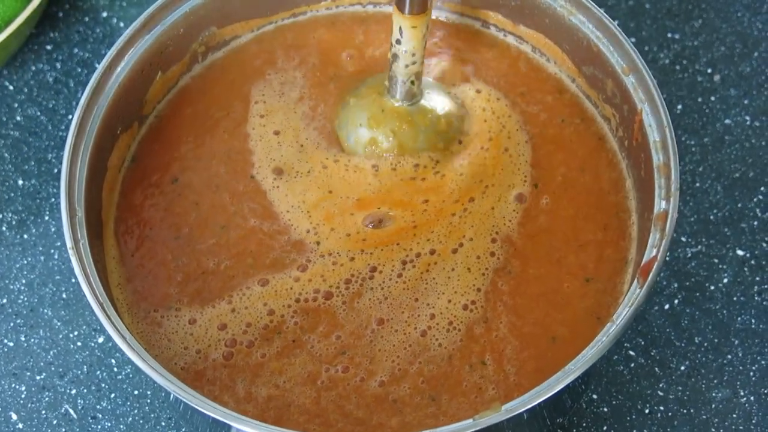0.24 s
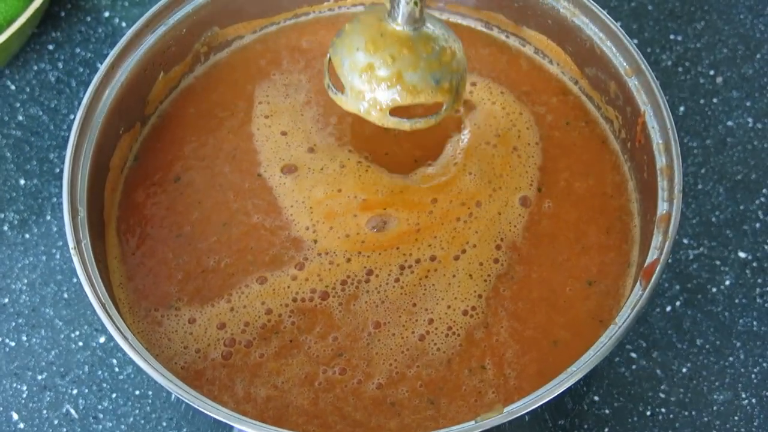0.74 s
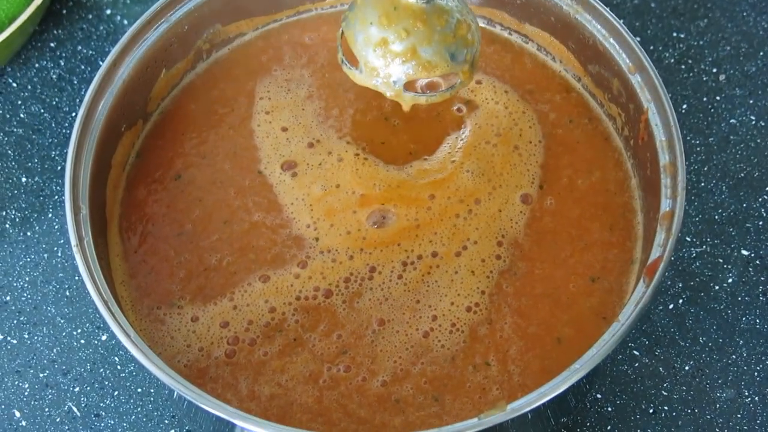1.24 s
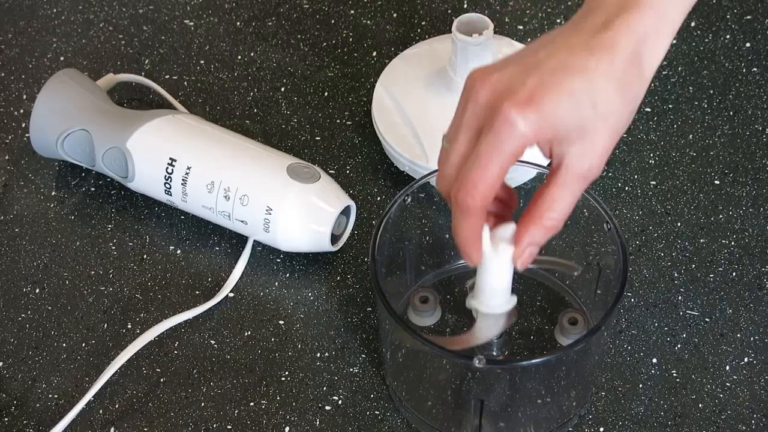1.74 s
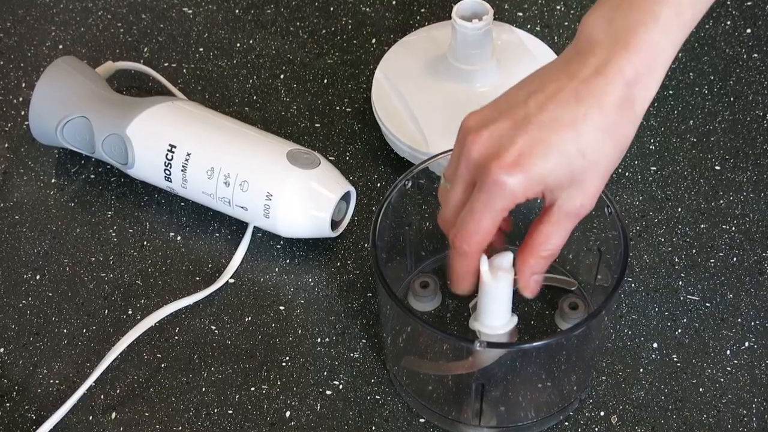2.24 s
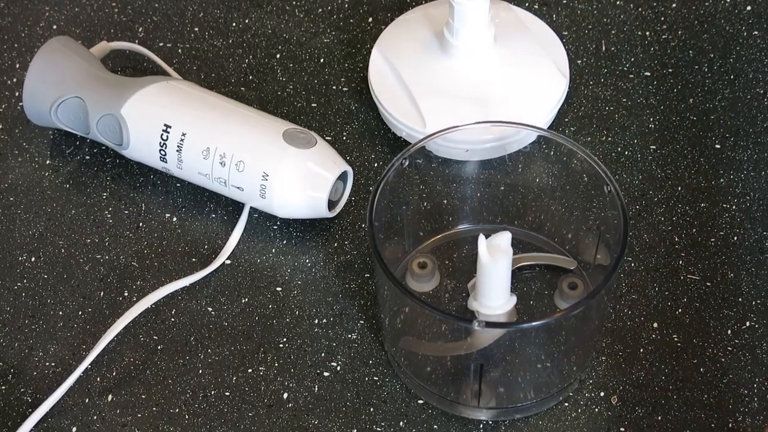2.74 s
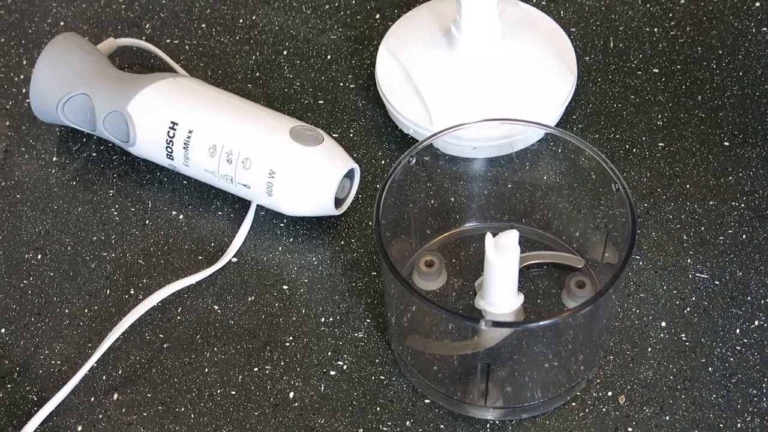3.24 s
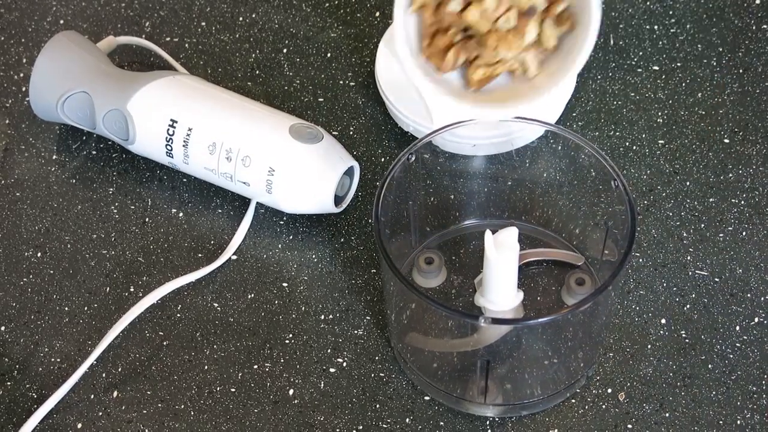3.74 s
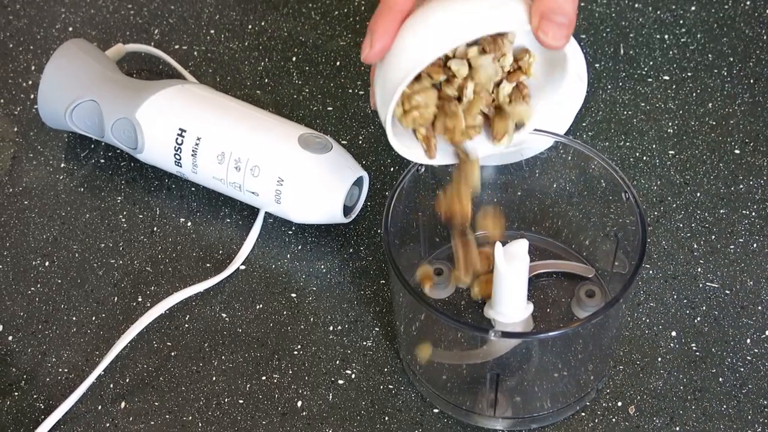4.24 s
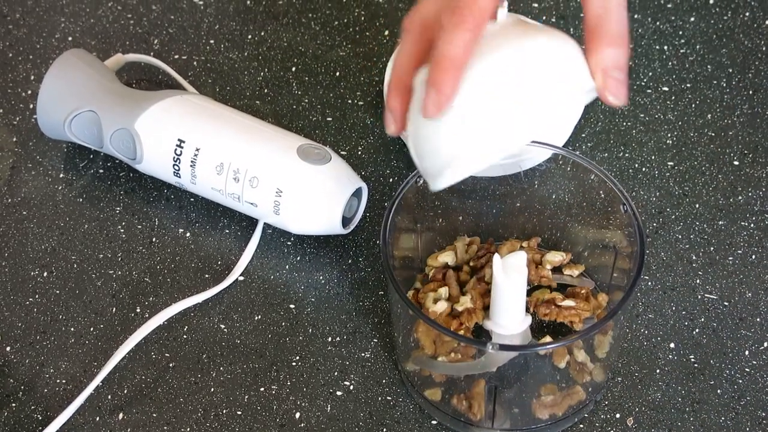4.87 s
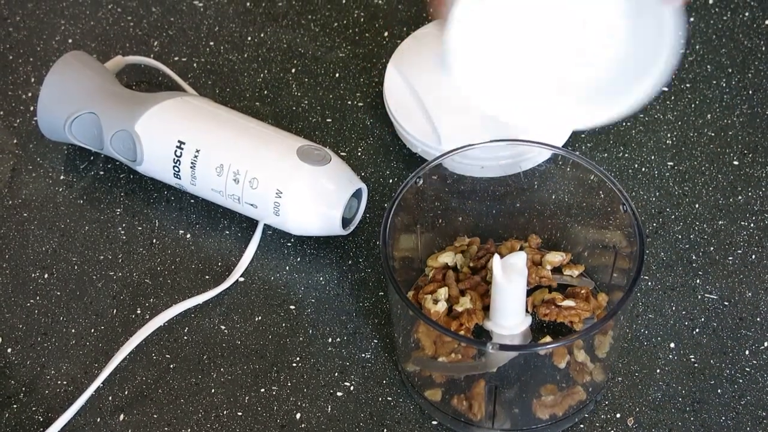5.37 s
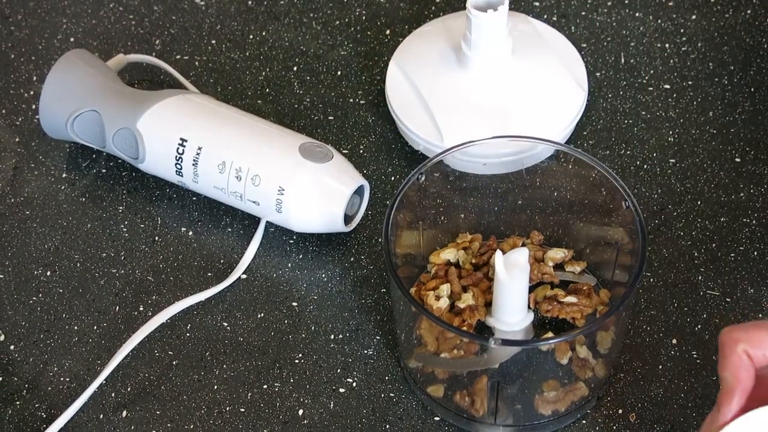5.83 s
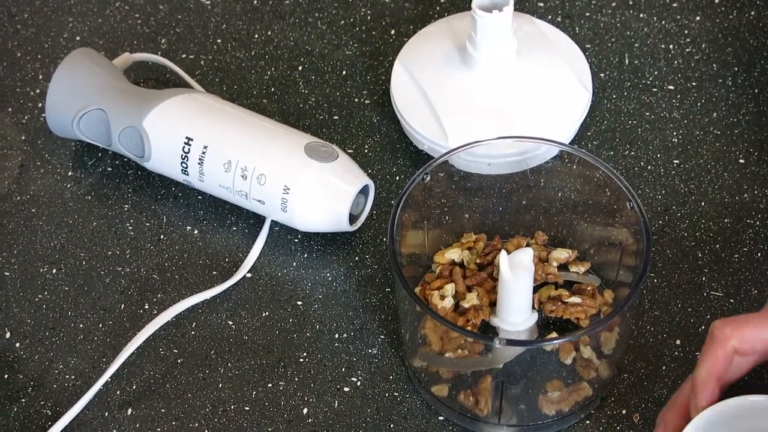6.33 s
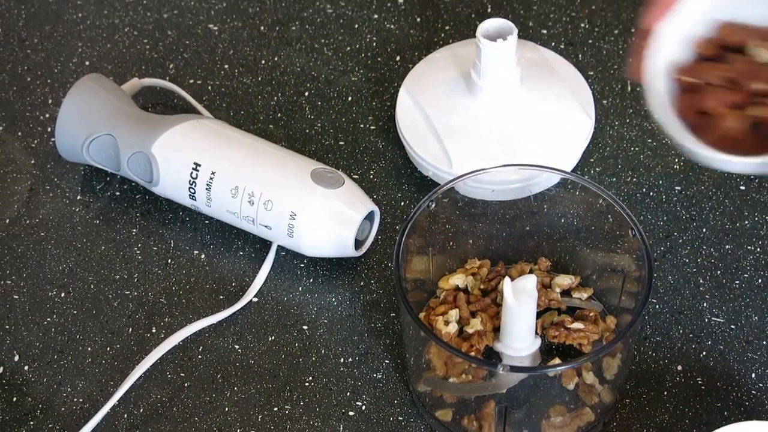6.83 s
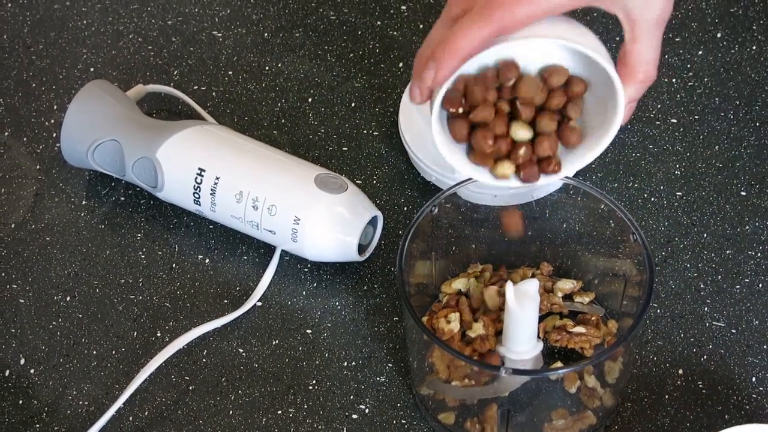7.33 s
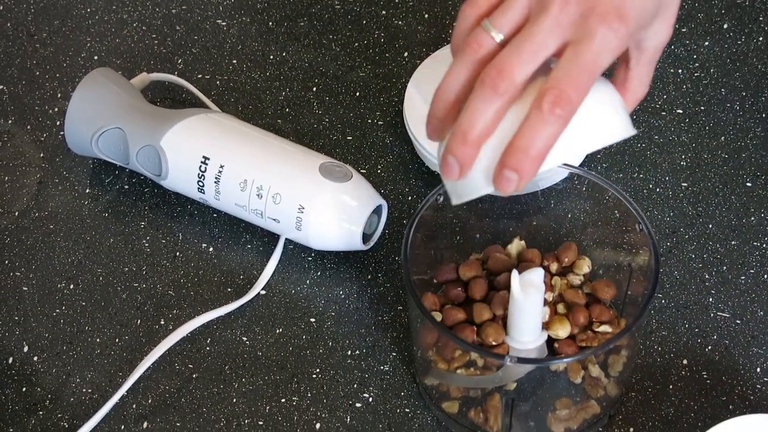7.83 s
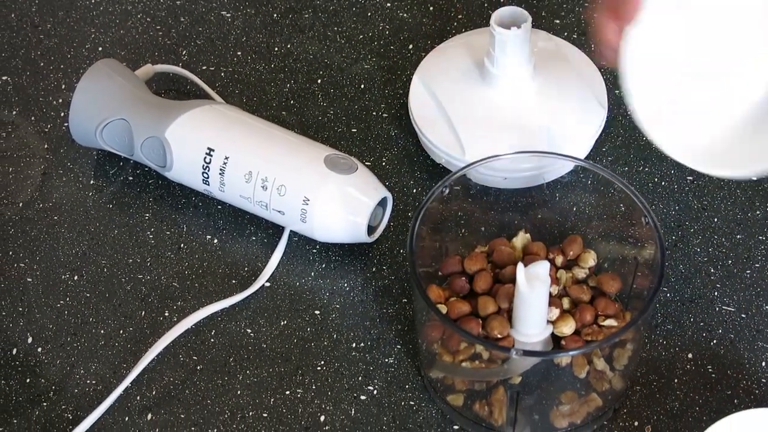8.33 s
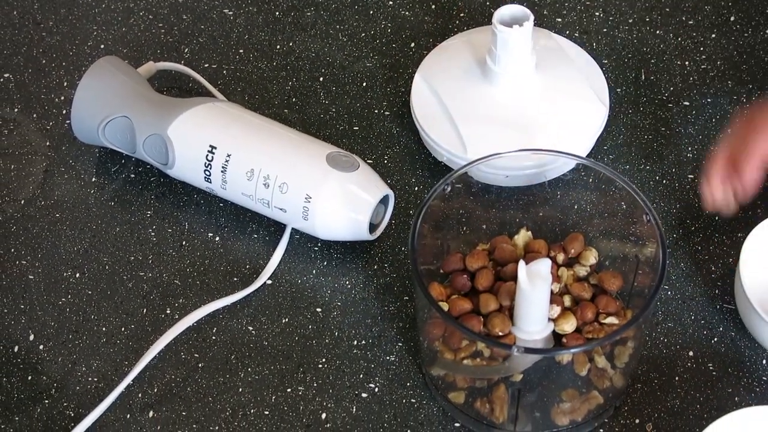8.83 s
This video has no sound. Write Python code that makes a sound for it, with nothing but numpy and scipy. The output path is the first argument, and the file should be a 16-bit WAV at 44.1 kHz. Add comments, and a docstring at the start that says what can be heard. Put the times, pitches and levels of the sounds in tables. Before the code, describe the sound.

Over a pot of soup, low room hum with swelling hiss, a few drips and a small metal tick. The sound cuts out briefly, then loud hollow plastic clacks as a blade is fitted. Two pours of nuts rattle sharply in the plastic beaker, each ended by an empty china bowl thudding onto a stone-like worktop. Close, wide stereo pickup in a lively kitchen; loud moments push the background down.

```python
"""A quiet kitchen: a blender foot drips over a pot; after a short silence a blade clicks onto the pin of a plastic
beaker, two china bowls of nuts are poured into it and set down on the worktop. Struck things are decaying modes
plus cracks of filtered noise; nuts are a random train of blows; room tone is shaped random spectra. The hard room
rings after every knock; automatic gain ducks the loud moments and the hum with them, and the loudest peaks clip."""
import sys
import numpy as np
from scipy import signal
from scipy.io import wavfile
from scipy.ndimage import uniform_filter1d

SR = 44100
rng = np.random.default_rng(int(sys.argv[2]) if len(sys.argv) > 2 else 0)


def persist_wave(psi):
    """Save psi, clipped to +-1, as 16-bit WAV."""
    counts = np.round(np.clip(psi, -1, 1) * 32767).astype(np.int16)
    wavfile.write(sys.argv[1], SR, np.atleast_2d(counts).T)


N = 401310

# Room tone over the pot, then at the worktop. Each row: frequency in Hz, relative density in dB per Hz.
POT_TONE = [(18, -44), (30, -40), (53, -5.5), (81, -41), (118, -9), (174, -5.5), (404, -8), (616, -13.5),
            (666, -14), (1390, -18), (3140, -33.5), (6210, -41), (16000, -56.5)]
TOP_TONE = [(18, -71), (30, -12.5), (70, -17), (98, -4), (179, -13.5), (328, -8.5), (554, -11.5), (740, -9),
            (1040, -17), (1430, -17.5), (1630, -19), (3140, -33), (8300, -37.5), (13300, -42.5),
            (16000, -44)]
# Hums in each tone. Each row: centre in Hz, width in Hz, level in dB.
POT_HUMS = [(118, 4.4, -51.5), (330, 15, -54.5), (417, 23, -56)]
TOP_HUMS = [(100.6, 4.7, -61), (321.4, 24, -54.5), (5130, 8, -75)]
POT_TONE_DB, TOP_TONE_DB = -47.5, -44
# Swell of the pot's room tone. Each row: time in seconds, relative level of the mids in dB, of the treble hiss in dB.
POT_SWELL = [(0, -1, 13), (.18, -10, 3.5), (.38, -1, 8), (.52, -3, 16), (.7, -5.5, 6), (.9, -2, 9.5),
             (1.35, 0, 10.5), (1.57, -6, 8)]
# Stereo likeness of the room tone. Each row: frequency in Hz, left-right correlation (-1 to 1).
LIKENESS = [(60, 0.19), (180, 0.073), (550, 0.077), (1650, 0.12), (5000, 0.32), (15000, 0.15)]
DRONE_HZ, DRONE_DB = 102.7, -53.5
SILENCE_START_S, SILENCE_END_S = 1.572, 1.737

# Soup falling back into the pot. Each row: start in seconds, level in dB, starting bubble pitch in Hz.
DRIPS = [(.06, -32, 330), (.09, -40, 570), (.144, -32.5, 613)]
# Foam pops. Each row: start in seconds, level in dB, starting pitch in Hz.
FOAM_POPS = [(0.326, -37.5, 8480), (0.4144, -43, 7180), (0.5506, -43, 11300), (0.6549, -49, 12400)]
# Modes of the steel pot. Each row: frequency in Hz, relative level in dB, t60 in seconds.
POT_MODES = [(960, -14, 0.056), (1064, -2, 0.086), (1300, -5, 0.053), (1770, 2, 0.019), (2144, 5.5, 0.041),
             (2400, 1, 0.013), (3300, -7, 0.013)]
POT_TICK_S, POT_TICK_DB = 0.6155, -22.5

# Reverberation of the kitchen. Each row: frequency in Hz, t60 in seconds.
KITCHEN_T60 = [(100, 0.18), (260, 0.52), (700, 0.71), (1840, 0.64), (4850, 0.59), (12800, 0.33)]

# Modes of two china bowls and the steel blade, one table each. Each row: frequency in Hz, relative level in dB,
# t60 in seconds when free.
CHINA_MODES = [
    [(2205.3, 2.5, 0.95), (2214, -0.5, 0.95), (5520, -16, 0.32), (8500, -24, 0.34), (13600, -36, 0.41)],
    [(2212, 12.5, 0.44), (2370, 1, 0.4), (5720, -6, 0.62), (8300, -54, 0.23), (13710, -31, .4)],
    [(2590, -0.5, .15), (2380, -4, .15), (5300, -13.5, .15)],
]
# Nuts, fingers or the worktop chink a bowl or the blade, one table each. Each row: start in seconds, level in dB,
# hardness in dB per octave, share of the free t60, tick in dB, left over right in dB.
CHINKS = [
    [(3.8372, -35.5, 9, 0.064, -38, 3), (4.134, -41.5, 2, 0.018, -45.5, 27),
     (6.385, -24.5, -8, 0.88, -72, 1)],
    [(7.0499, -51, 4, 0.15, -42, -5), (7.0745, -42.5, 9.5, 0.074, -29, -4.5),
     (7.1038, -44, -1, 0.05, -37, -8), (7.088, -41, 3, 0.05, -40, -2), (7.125, -43, 4, 0.05, -45, -2),
     (7.15, -46, 7, 0.05, -44, -2), (7.213, -31, -6, 0.031, -25.5, -3), (8.6527, -110, -56, 0.17, -15.5, 6)],
    [(1.833, -36, 3, 0.26, -46, 0), (1.855, -26, 0.6, 0.21, -50, 0)],
]
DAMPED_ROOM_DB, FREE_ROOM_DB = -2.5, -18  # room send of a damped chink; change towards a fully free ring

# Modes of the plastic beaker. Each row: nominal frequency in Hz, relative level in dB, t60 in seconds.
BEAKER_MODES = [(619, -12, 0.19), (700, -15, 0.048), (771.3, 1.5, 0.14), (821.4, 0.5, 0.14),
                (924, 2.5, 0.061), (1370, 1, 0.031), (1465, 6, 0.021), (1500, 5, 0.075), (1664, 6.5, 0.036),
                (1860, -14.5, 0.019), (2417, -1.5, 0.034), (2485, 12, 0.023), (2860, -29, 0.067),
                (3200, -4.5, 0.078), (3516, -2.5, 0.053), (4464, -4, 0.027), (5030, 8.5, 0.024),
                (5390, 9.5, 0.022), (5980, 4, 0.026), (6510, -33, .02), (7870, -13, 0.013),
                (9650, 11, 0.011), (10500, 3, 0.018)]
# Edges in Hz between the bands of base, wall, rim, spindle and bare contact.
PART_EDGES_HZ = 480, 1100, 2000, 4000, 7300, 15500
# Crack in each part, ordered wall, base, rim, spindle, contact. Each row: dB over the ring, decay constant in ms.
CRACKS = [(0.5, 3.5), (-2, 4.4), (-3.5, 2.4), (-3.5, 4.3), (-0.5, 2.9)]
# Blade, bowl rim, walnut, hazelnut on the beaker. Each row: base, rim, spindle and contact in dB over the wall,
# left over right in dB, rise in ms.
STRIKERS = [(-2, -7, -5, -17.5, 5.5, 0.31), (1, 1.5, -4.5, -10.5, -0.5, 0.38),
            (-8, 2.5, 1, -8.5, -1.5, 1.8), (-13.5, -5, -10.5, -22.5, -2, 1.7)]
# Gain in dB of base, rim, spindle and contact for each dB of hardness.
HARDNESS_GAINS = 0.14, 0.91, 1.056, 1.03
PART_SPREAD_DB, PAN_SPREAD_DB = 2, 2.5  # from blow to blow
# Blows that stand out, one table per striker. Each row: start in seconds, wall level in dB, hardness in dB.
BLOWS = [
    [(1.8557, -40, 5), (1.949, -4, -6), (1.9886, -17, -10), (2.074, -4.5, 4.5), (2.0844, -23, -6)],
    [(3.918, -5.5, -1.8), (7.7855, -16.5, 9), (7.809, -25.5, 5)],
    [(4.1578, -28.5, 15), (4.2404, -14, -16), (4.2589, -10.5, 3.5), (4.2637, -12, -3), (4.2904, -22, -1),
     (4.2945, -9.5, 3.5), (4.319, -34, -6), (4.3345, -4, 0.5), (4.3644, -18, 7.5), (4.4282, -8, 2),
     (4.4636, -11, 4), (4.5032, -4.5, 3.5), (4.5304, -5, -6), (4.5596, -18, 11), (4.6204, -5, -4.2),
     (4.6954, -11.5, 3.5), (4.7442, -16, -3.5), (4.7924, -12.5, 0), (4.8149, -9.5, -6), (4.9, -21.5, 0),
     (5.0174, -33, 5.5), (5.0932, -54.5, 24)],
    [(7.2599, -13.5, -4), (7.3101, -19, -13), (7.3223, -16.5, -3), (7.365, -17, 5.5), (7.422, -9.5, 4.5),
     (7.4954, -23, -9), (7.5178, -13.5, 12), (7.5403, -11, 3), (7.5604, -10, 1), (7.575, -8.5, 2),
     (7.5987, -31, -9), (7.6154, -13, 9.5), (7.6984, -13.5, 4), (7.7424, -22.5, 12), (7.862, -37, -24)],
]

# Modes of the worktop. Each row: nominal frequency in Hz, relative level in dB, t60 in seconds.
WORKTOP_MODES = [(413, -2, .07), (566, -13, 0.16), (644, -14.5, 0.011), (808, -9, 0.028), (924, -13, 0.011),
                 (1040, -30, 0.011), (1200, -3, 0.045), (1426, 6.5, 0.02), (1696, 10, 0.016),
                 (2070, 10.5, 0.0035), (2470, 16, 0.003), (3010, 8.5, 0.0015)]
# Things set down, and their bounces. Each row: start in seconds, peak in dB, highest driven frequency in Hz,
# scrape in dB, scrape decay constant in seconds, room send in dB over the peak.
KNOCKS = [(2.94, -36, 950, -41, 0.032, 12.5), (6.0184, -5, 1500, -34, 0.0043, 11.5),
          (6.303, -27.5, 700, 0, 0.013, -4), (6.32, -7.5, 2290, -14, 0.02, 9.5),
          (6.336, -1, 3200, -19, 0.0034, 3.5), (6.354, -4.5, 2300, -18.5, 0.0052, -5.5),
          (8.6534, 3.5, 3300, -21.5, 0.0044, 4.5), (8.667, -3.5, 4300, -35, 0.0024, 11)]
LOW_FLOOR_HZ, LOW_SHARE = 253, 0.053  # lowest driven pitch: a floor plus a share of the highest
# The weight of a bowl lands. Each row: start in seconds, level in dB.
BOOMS = [(6.0206, -28.5), (6.326, -32.5), (8.6518, -28)]
SLAB_HZ, SLAB_T60_S = 118.2, 0.41

# Walnuts, then hazelnuts, tumbling onto the heap. Each row: time in seconds, relative wall level in dB, hardness in dB.
POURS = [
    [(4.235, -27, -4.5), (4.32, -26, -21), (4.62, -26, -6), (4.78, -51, 0.1), (5.1, -69, 5.5)],
    [(7.26, -44, -7), (7.42, -40.5, -25), (7.56, -20, 3.5), (7.7, -33.5, -1), (7.9, -39.5, -14)],
]
NUTS_PER_S = 190  # mean rate
HEAP_BASE_DB = 10.5  # the heap passes the tumbling on to the base

TREBLE_EDGE_HZ = 15800


def gain_of(db):
    """Decibels to a factor."""
    return 10 ** (np.asarray(db) / 20)


def evened(x):
    """Scales to rms 1."""
    return x / np.sqrt(np.mean(x ** 2) + 1e-20)


def read(points, hz):
    """Reads a spectrum table on a log-frequency axis."""
    f, value = np.transpose(points)
    return np.interp(np.log(hz + 1), np.log(f + 1), value)


def add(mix, start_s, sound, pan_db):
    """Adds a sound to the mix; positive pan favours the left."""
    part = mix[:, round(start_s * SR):][:, :len(sound)]
    part += gain_of([[pan_db / 2], [-pan_db / 2]]) * sound[:part.shape[1]]


def without_bass(x, hz):
    """A small thing radiates little below its lowest mode."""
    return signal.sosfilt(signal.butter(5, hz, "high", fs=SR, output="sos"), x)


def ring(modes, size=3000):
    """One blow, peak 1: where it lands decides how strongly each mode speaks."""
    hz, db, t60_s = np.transpose(modes)[:, :, None]
    level_luck, pitch_luck = rng.standard_normal((2, len(modes), 1))
    t = np.arange(size) / SR
    envelope = gain_of(db + 3 * level_luck - 60 * t / t60_s)
    x = (envelope * np.sin(2 * np.pi * hz * (1 + 0.0057 * pitch_luck) * t)).sum(0)
    return x / abs(x).max()


def crack(low_hz, high_hz, ms, size=3000):
    """Decaying band of noise, peak 1: two hard surfaces meeting."""
    x = rng.standard_normal(size) * np.exp(-np.arange(size) / SR * 1000 / ms)
    x = signal.lfilter(*signal.butter(2, [low_hz, high_hz], "band", fs=SR), x)
    return x / abs(x).max()


def room_tone(tone, tone_db, hums, mid_db=0, hiss_db=0):
    """Random short-time spectra with drifting patches; hums are narrow humps that waver."""
    frames, hz = (N // 512 + 5) // 2, np.fft.rfftfreq(4096, 1 / SR)[:, None]
    a, b, c, d = rng.standard_normal((frames, 2049, 4)).T
    patches = uniform_filter1d(rng.standard_normal((frames, 2049)).T, 30, 0)
    patches = evened(uniform_filter1d(patches, 4, 1))

    likeness = np.clip(read(LIKENESS, hz), -1, 1)
    left = a + 1j * b
    right = likeness * left + np.sqrt(1 - likeness ** 2) * (c + 1j * d)

    wash = gain_of(read(tone, hz))
    wash = wash * gain_of(tone_db) / np.linalg.norm(wash)
    power = wash ** 2
    for centre_hz, width_hz, hum_db in hums:
        hump = 1 / (1 + (2 * (hz - centre_hz) / width_hz) ** 4)
        power = power + gain_of(2 * hum_db) * hump / hump.sum()
    shape = np.sqrt(power)

    mids = 1 / (1 + (150 / (hz + 1)) ** 4 + (hz / 2500) ** 4)
    highs = 1 / (1 + (6000 / (hz + 1)) ** 4)
    moving = gain_of(1.54 * patches + mids * mid_db + highs * hiss_db)
    spectra = np.array([left, right]) * shape * moving
    x = signal.istft(spectra, nperseg=4096, noverlap=3072)[1][:, :N]
    return evened(x) * np.linalg.norm(shape)


def pot():
    """Bubbles of falling drips rise a little in pitch; foam pops; the steel ticks."""
    out, t = np.zeros((2, N)), np.arange(3000) / SR
    for start_s, db, hz in DRIPS:
        envelope = gain_of(db - 60 * t / 0.036) * np.minimum(t / 0.0013, 1)
        add(out, start_s, envelope * np.sin(2 * np.pi * hz * t * (1 + 2.0 * t)), 0)
    for start_s, db, hz in FOAM_POPS:
        envelope = gain_of(db - 60 * t / 0.0028)
        add(out, start_s, envelope * np.sin(2 * np.pi * hz * t * (1 + 8.0 * t)), 0)
    tick = ring(POT_MODES) + gain_of(-10.5) * crack(1150, 2900, ms=5.9)
    add(out, POT_TICK_S, gain_of(POT_TICK_DB) * tick, 1.5)
    return out


def kitchen(x):
    """Sparse echoes of random sign, each band dying at its own speed; three tails blend in a steady rotation,
    so the reverberation wavers."""
    turn, out = np.arange(N) / SR * 2.3, 0  # 2.3 turns a second
    for k in range(3):
        taps = np.zeros((2, 30000))
        at = np.arange(200, 30000, 20) + rng.integers(0, 20, (2, 1490))
        np.put_along_axis(taps, at, rng.choice([-1., 1.], at.shape), 1)
        taps[1] = 0.48 * taps[0] + 1.0 * taps[1]  # the two microphone ports lie close and share much of the tail
        hz, t, z = signal.stft(taps, SR, nperseg=256)
        decay = gain_of(-60 * t / read(KITCHEN_T60, hz)[:, None])
        tail = signal.istft(z * decay, SR, nperseg=256)[1]
        tail /= np.linalg.norm(tail, axis=1, keepdims=True)
        share = np.sqrt(2 / 3) * np.cos(2 * np.pi * (turn + k / 3))
        out = out + signal.fftconvolve((share * x)[None], tail, axes=1)[:, :N]
    return out


def china_and_blade():
    """A split pair of bowl modes beats as it dies; nuts and fingers damp the ring."""
    (out, send), t = np.zeros((2, 2, N)), np.arange(SR) / SR
    for modes, chinks in zip(CHINA_MODES, CHINKS):
        hz, mode_db, t60_s = np.transpose(modes)[:, :, None]
        for start_s, db, hard_db, free, tick_db, pan_db in chinks:
            level_db = db + mode_db + hard_db * np.log2(hz / hz[0]) - 60 * t / (t60_s * free)
            x = (gain_of(level_db) * np.sin(2 * np.pi * hz * t)).sum(0)
            x += gain_of(tick_db) * crack(1800, 9100, ms=3.5, size=len(t))
            add(out, start_s, x, pan_db)
            add(send, start_s, gain_of(DAMPED_ROOM_DB + FREE_ROOM_DB * free) * x, 0)
    return out, send


def part_levels_db(striker, wall_db, hard_db):
    """Hardness tilts the parts: levels of wall, base, rim, spindle, contact."""
    return [wall_db] + [wall_db + part_db + k * hard_db for part_db, k in zip(striker, HARDNESS_GAINS)]


def beaker_blow():
    """One row for each part of the beaker, wall first: its modes and its share of the crack."""
    parts = []
    for k, (crack_db, ms) in zip((1, 0, 2, 3, 4), CRACKS):
        low_hz, high_hz = PART_EDGES_HZ[k:k + 2]
        modes = [mode for mode in BEAKER_MODES if low_hz < mode[0] < high_hz]
        parts.append(ring(modes) + gain_of(crack_db) * crack(low_hz, high_hz, ms))
    return np.array(parts)


def beaker():
    """Single blows; striker, hardness and a little luck decide which parts speak."""
    out, t_ms = np.zeros((2, N)), np.arange(3000) / SR * 1000
    for striker, blows in zip(STRIKERS, BLOWS):
        pan_db, rise_ms = striker[4:]
        rise = np.minimum(t_ms / rise_ms, 1)
        for start_s, wall_db, hard_db in blows:
            *part_luck, pan_luck = rng.standard_normal(6)
            level_db = part_levels_db(striker, wall_db, hard_db) + PART_SPREAD_DB * np.array(part_luck)
            x = rise * (gain_of(level_db) @ beaker_blow())
            add(out, start_s, x, pan_db + PAN_SPREAD_DB * pan_luck)
    return without_bass(out, 579)


def worktop():
    """A blow and the short scrape after it drive the slab; softer contacts reach only its low modes."""
    (out, send), t = np.zeros((2, 2, N)), np.arange(6000) / SR
    for start_s, db, high_hz, scrape_db, decay_s, room_db in KNOCKS:
        scrape = gain_of(scrape_db) * rng.standard_normal(len(t)) * np.exp(-t / decay_s)
        push = scrape + (t == 0)
        x = signal.oaconvolve(push, ring(WORKTOP_MODES))[:len(t)] + gain_of(12.5) * push
        x = signal.lfilter(*signal.butter(4, high_hz, fs=SR), x)
        x = without_bass(x, LOW_FLOOR_HZ + LOW_SHARE * high_hz)
        x = x / abs(x).max()
        add(out, start_s, gain_of(db) * x, 1.0)
        add(send, start_s, gain_of(db + room_db) * x, 0)
    for start_s, db in BOOMS:  # the whole slab booms
        envelope = gain_of(-60 * t / SLAB_T60_S) * np.minimum(t / 0.0054, 1)
        boom = envelope * np.sin(2 * np.pi * SLAB_HZ * t)
        boom += gain_of(3) * crack(120, 310, ms=70.0, size=len(t))  # cupboards below rumble along
        add(out, start_s, gain_of(db) * boom, 1.0)
    return out, send


def nut_rattle():
    """Many small nuts of uneven weight, each landing on one of a dozen spots."""
    out = np.zeros((2, N))
    for pour, nut in zip(POURS, STRIKERS[2:]):
        s, wall_db, hard_db = np.transpose(pour)
        t = np.arange(s[0], s[-1], 1 / SR)
        landings = rng.random(SR) < NUTS_PER_S / SR
        weight = evened(gain_of(1.64 * np.minimum(rng.exponential(1, SR), 4)) * landings)
        spot = rng.integers(0, 12, SR)
        on_heap = (nut[0] + HEAP_BASE_DB, *nut[1:])
        level_db = np.array(part_levels_db(on_heap, np.interp(t, s, wall_db), np.interp(t, s, hard_db)))
        for k in range(12):
            hits = (weight * (spot == k))[None]
            parts = signal.oaconvolve(hits, beaker_blow(), axes=1)[:, :len(t)]
            add(out, s[0], (gain_of(level_db - 18) * parts).sum(0), rng.uniform(0, 3.3))
    return without_bass(out, 687)


def scene():
    """Room tone and struck sounds over the pot, a silence, then at the worktop with a steady low drone."""
    t = np.arange(N) / SR
    s, mid_db, hiss_db = np.transpose(POT_SWELL)
    frame_s = np.arange((N // 512 + 5) // 2) * 1024 / SR
    mid_db, hiss_db = np.interp(frame_s, s, mid_db), np.interp(frame_s, s, hiss_db)
    pot_tone = room_tone(POT_TONE, POT_TONE_DB, POT_HUMS, mid_db, hiss_db)
    drone = gain_of(DRONE_DB) * np.sin(2 * np.pi * DRONE_HZ * t + [[0], [1.2]])
    top_tone = room_tone(TOP_TONE, TOP_TONE_DB, TOP_HUMS) + drone

    drips = pot()
    chinks, chinks_sent = china_and_blade()
    in_beaker = beaker() + nut_rattle()
    knocks, knocks_sent = worktop()
    sent = gain_of(-0.5) * in_beaker + chinks_sent + gain_of(-2) * drips + knocks_sent
    struck = in_beaker + chinks + drips + knocks + kitchen(sent.mean(0))

    before = np.clip((SILENCE_START_S - t) / 0.0057, 0, 1)
    after = np.clip((t - SILENCE_END_S) / 0.00097, 0, 1)
    return before * (pot_tone + struck) + after * (top_tone + struck)


def record(dry):
    """Gain control steps down at loud peaks, further while they go on, and creeps back; the highest still clip."""
    power_db = 10 * np.log10(abs(uniform_filter1d((dry ** 2).mean(0), 300, origin=149)) + 1e-12)
    fall_db = np.arange(N) * 5.3 / SR  # the held peak falls 5.3 dB a second
    held_db = np.maximum.accumulate(power_db + fall_db) - fall_db
    over_db = uniform_filter1d(np.maximum(held_db + 17.5, 0), 300, origin=149)
    keep = np.exp(-1 / (1.2 * SR))  # 1.2 s memory
    lasting_db = signal.lfilter([1 - keep], [1, -keep], np.maximum(power_db + 18.0, 0))
    ducked = dry * gain_of(1.98 - 0.28 * over_db - 5.73 * lasting_db)
    clipped = without_bass(np.clip(ducked, -1, 1), 36)  # the small microphone drops the deepest bass
    treble_cut = signal.firwin(511, TREBLE_EDGE_HZ, window=("kaiser", 9), fs=SR)
    return signal.oaconvolve(clipped, treble_cut[None], "same")


dry = scene()
out = record(dry)
persist_wave(out)
```